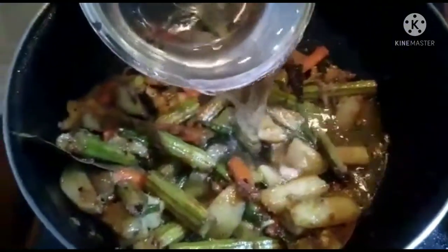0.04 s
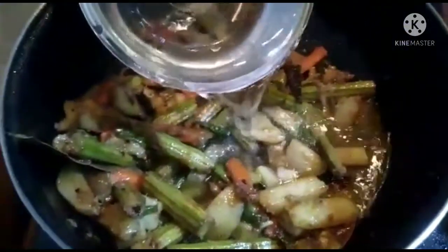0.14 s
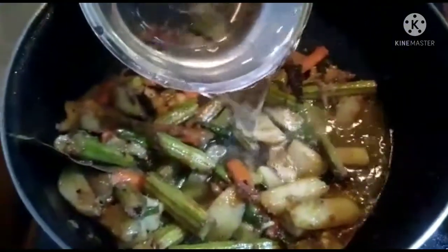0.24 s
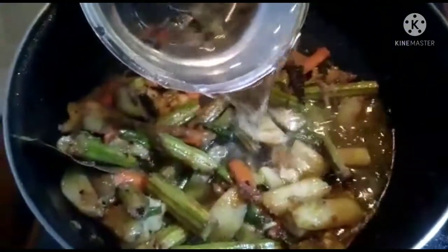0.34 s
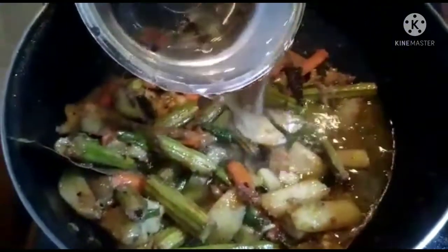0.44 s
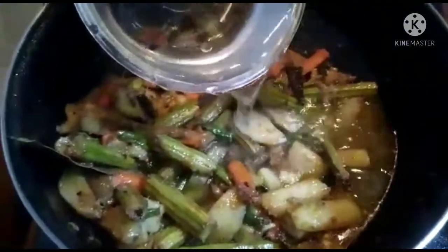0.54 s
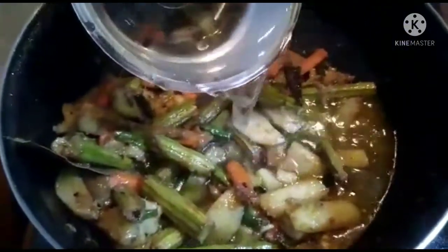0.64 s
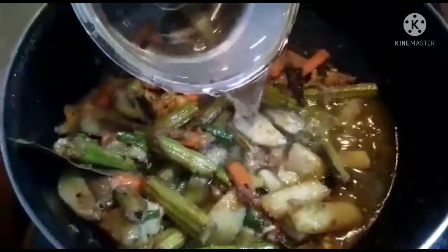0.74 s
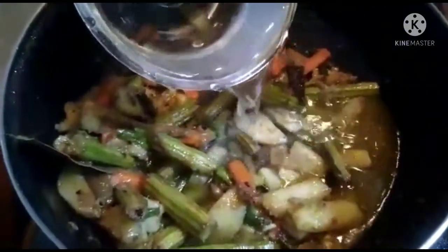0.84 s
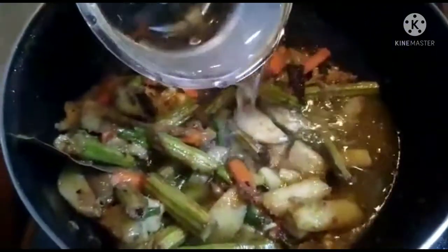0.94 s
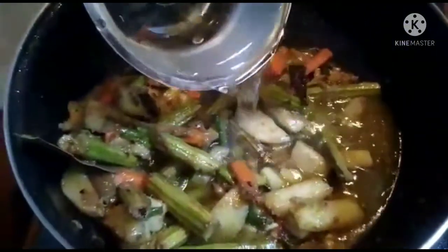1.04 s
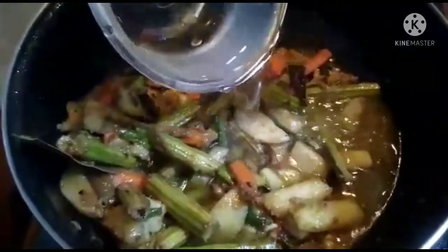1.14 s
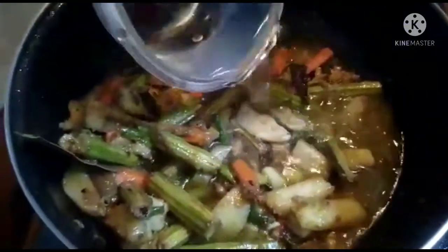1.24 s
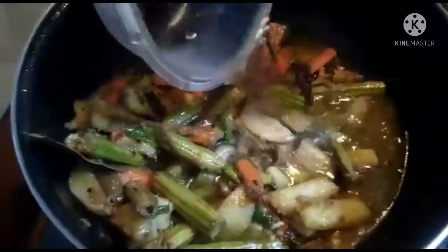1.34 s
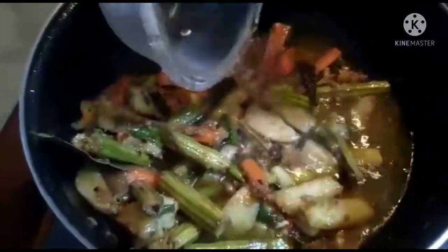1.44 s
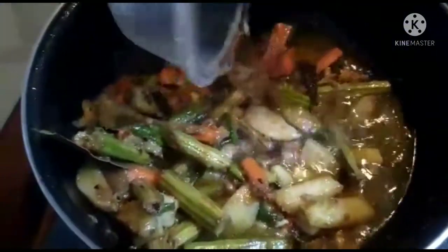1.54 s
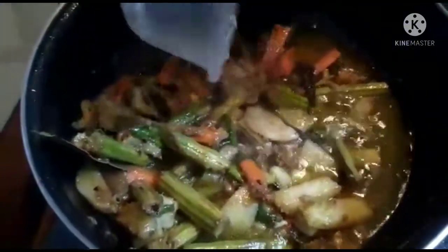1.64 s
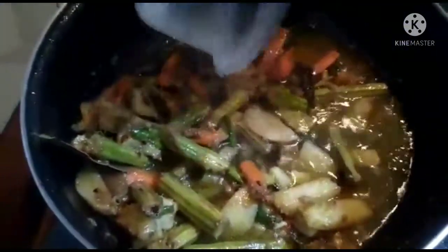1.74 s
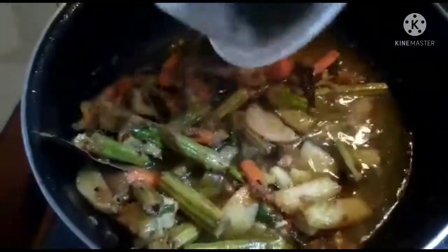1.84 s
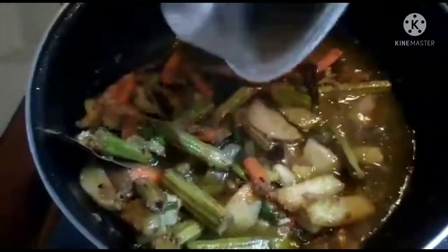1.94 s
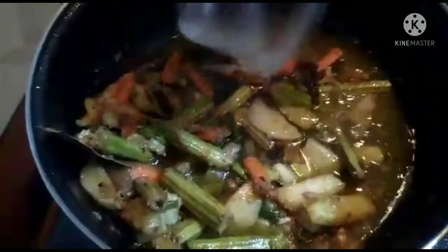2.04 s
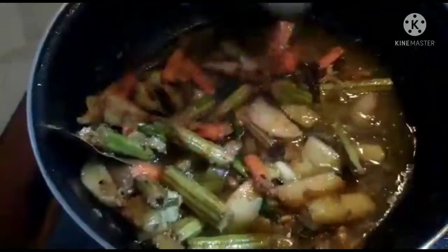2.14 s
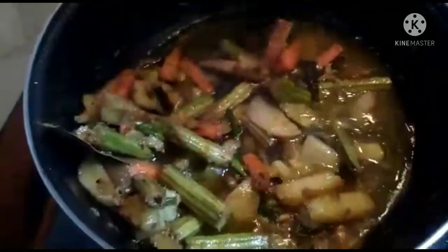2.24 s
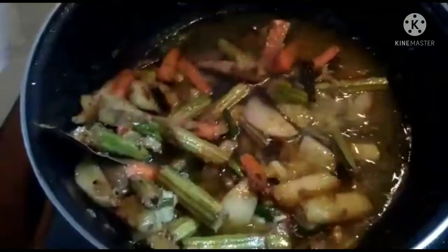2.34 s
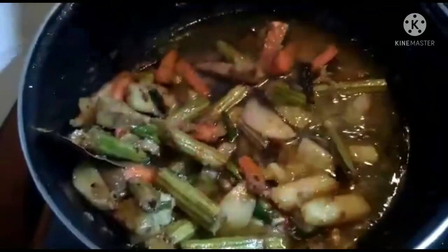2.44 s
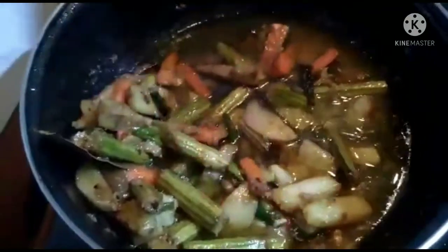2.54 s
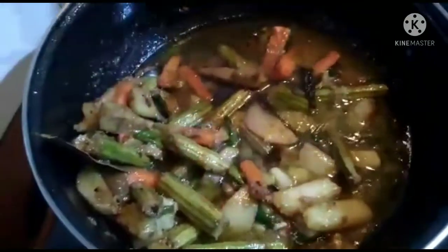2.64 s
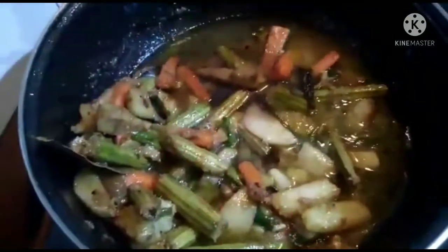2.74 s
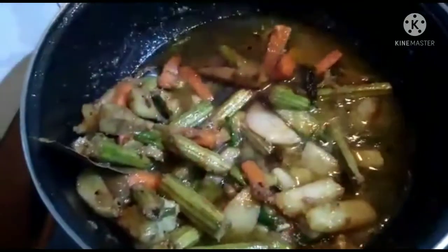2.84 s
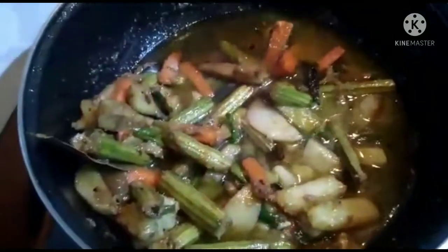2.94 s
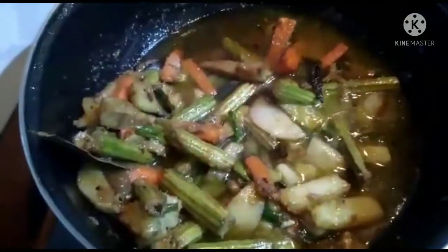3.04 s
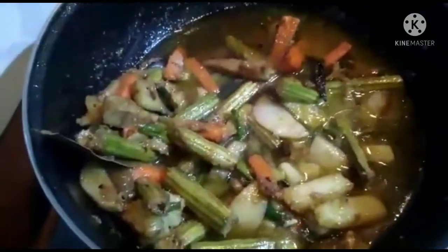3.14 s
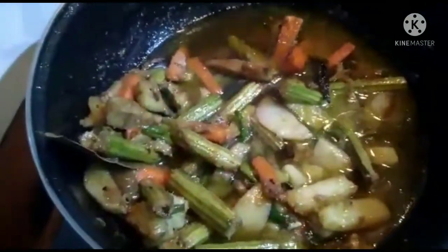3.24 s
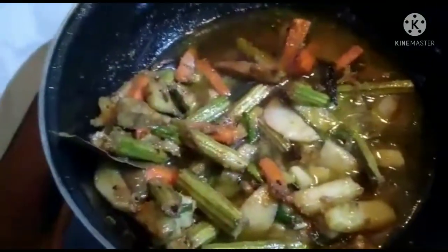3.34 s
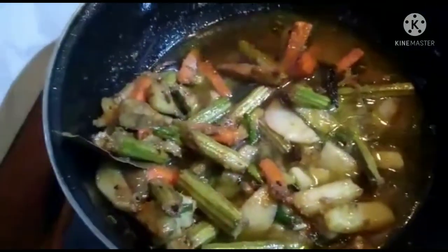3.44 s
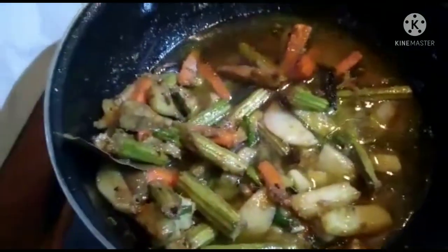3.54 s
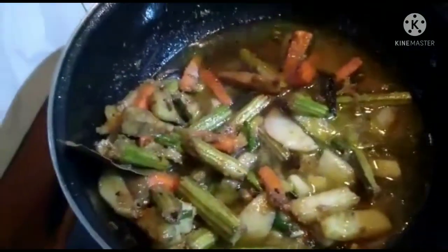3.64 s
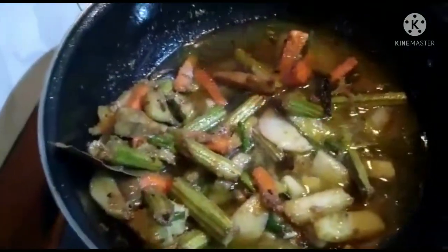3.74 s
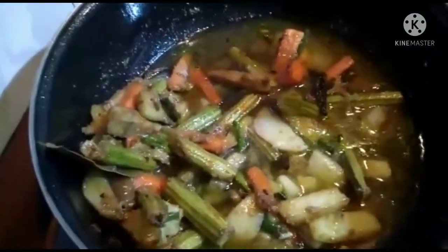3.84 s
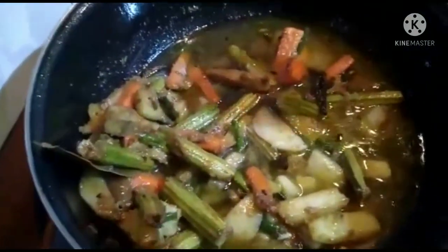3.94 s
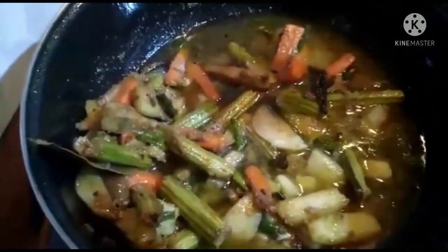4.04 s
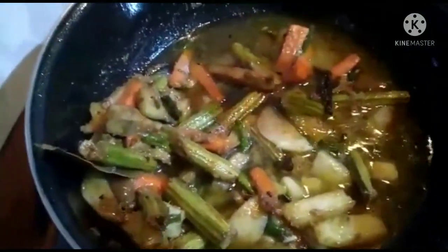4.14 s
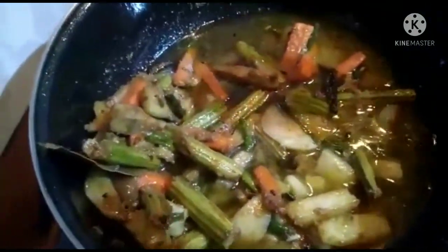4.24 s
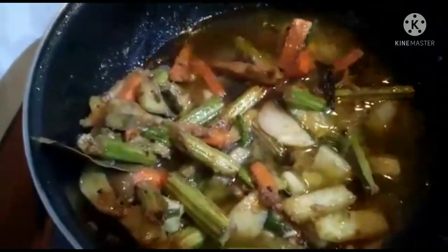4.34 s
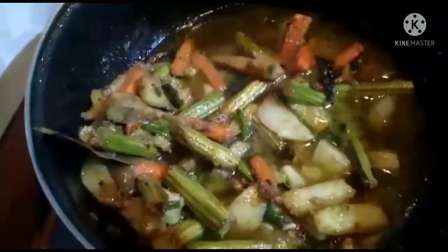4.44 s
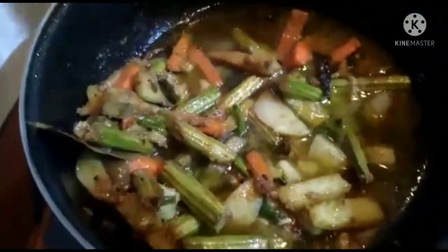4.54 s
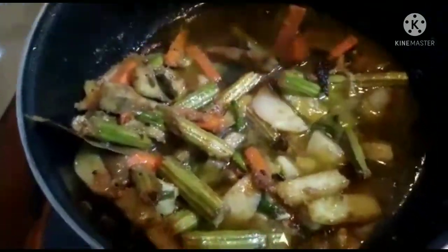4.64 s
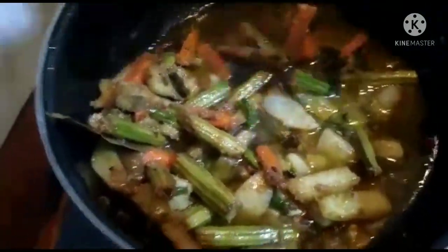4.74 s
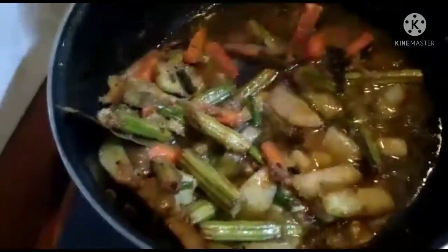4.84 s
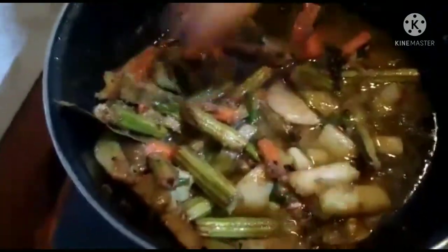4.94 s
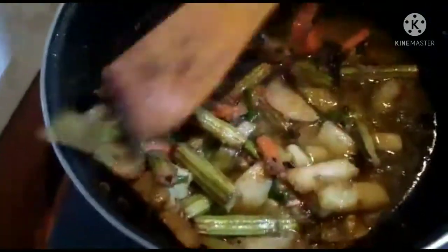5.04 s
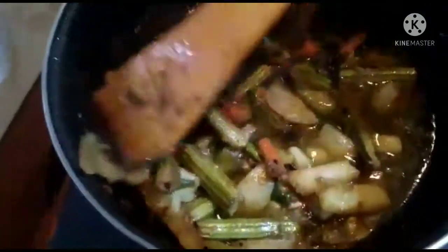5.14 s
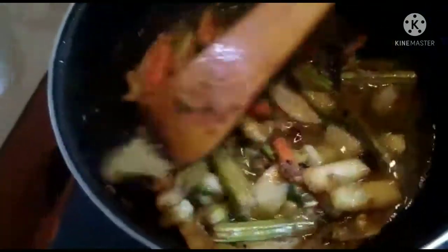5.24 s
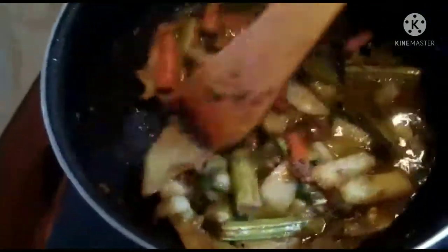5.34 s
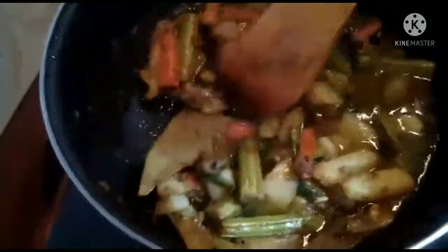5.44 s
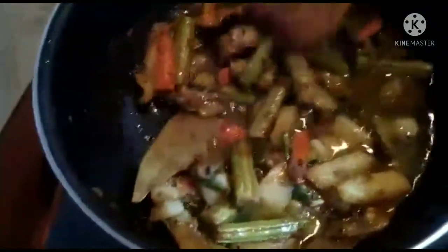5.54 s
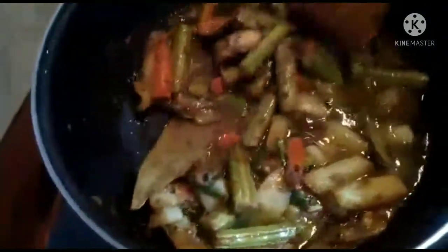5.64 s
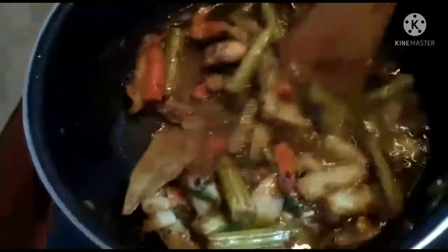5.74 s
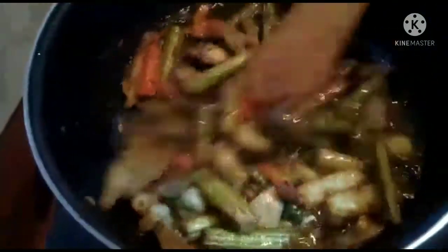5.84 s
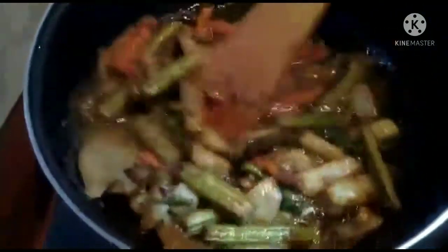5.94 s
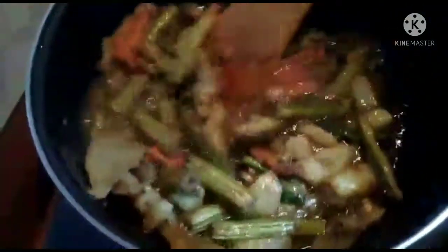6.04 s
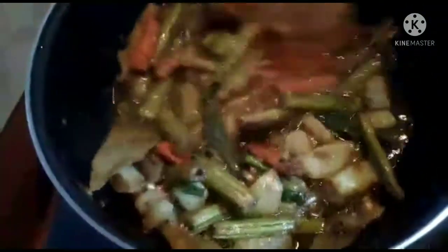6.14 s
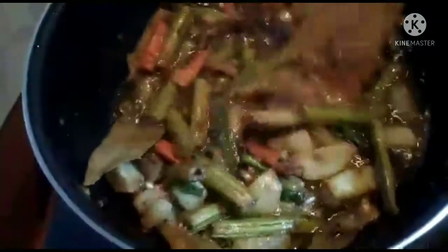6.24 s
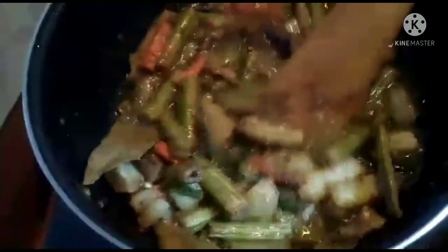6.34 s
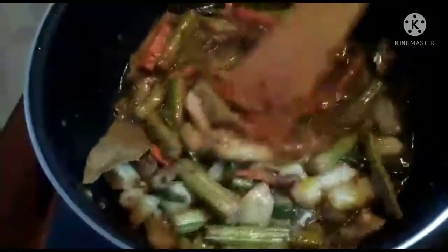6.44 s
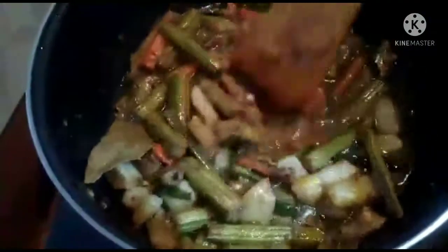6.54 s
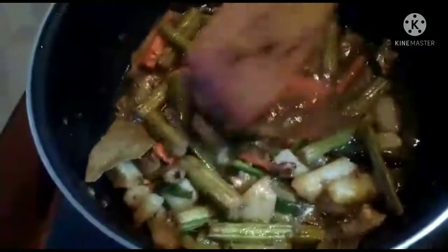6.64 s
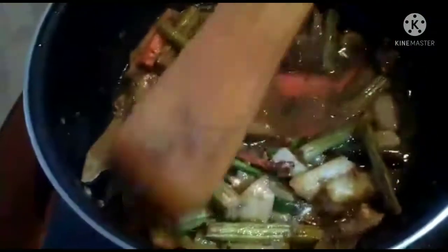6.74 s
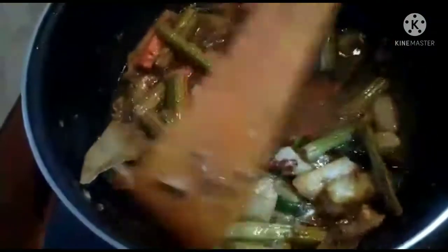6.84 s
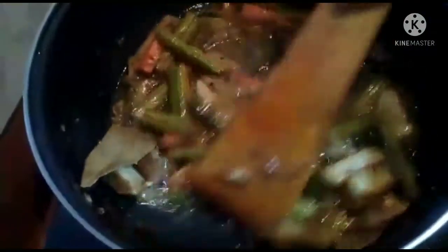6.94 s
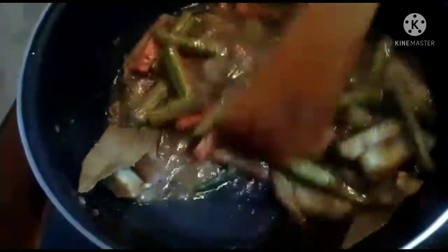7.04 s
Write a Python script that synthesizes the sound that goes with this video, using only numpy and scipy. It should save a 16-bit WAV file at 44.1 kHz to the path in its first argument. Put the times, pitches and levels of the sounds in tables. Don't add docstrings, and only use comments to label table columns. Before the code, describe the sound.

Fierce bright sizzling with popping drops opens the scene and weakens over about three seconds to low bubbling, a fan humming underneath. After a quiet gap, a metal bowl touches down in several knocks, the hardest sharp and ringing. Stirring follows: sizzle flares again with wet smacks, woody scrapes and one hard crack. Close stereo pickup, pan slightly left, short kitchen reverberation.

```python
import sys
import numpy as np
from scipy import signal
from scipy.fft import rfft, irfft, next_fast_len
from scipy.io import wavfile
from scipy.ndimage import uniform_filter1d, map_coordinates

SR = 44100
rng = np.random.default_rng(int(sys.argv[2]) if len(sys.argv) > 2 else 0)


def decibels_to_gain(level_db):
    exponent = np.asarray(level_db, float) / 20
    return 10 ** exponent


def digitize_waveform(pressure):
    field = np.atleast_2d(pressure).T
    bounded = np.clip(field, -1, 1)
    quanta = np.round(bounded * 32767).astype(np.int16)
    wavfile.write(sys.argv[1], SR, quanta)


N = 312669

# (frequency [Hz], density [dB per Hz])
AIR = [(12, -33), (20, -2), (69, -16.5), (103, 1), (141, -27), (192, -11), (248, -30.5), (269, -17.5),
       (585, -24.5), (623, -13.5), (677, -27), (784, -25.5), (3000, -32), (3900, -67), (6600, -120)]
# (frequency [Hz], width [Hz], level [dB])
HUM = [(49.7, 3, -86.5), (99.6, 2.2, -43), (172, 8, -60), (201, 5.5, -63)]
# (frequency [Hz], correlation [0-1])
ALIKE = [(30, 0.34), (60, 0.76), (130, 1), (300, 0.8), (640, 0.85), (1000, 0.32), (1500, 0.077),
         (3000, 0.081), (15000, 0.0094)]
# (frequency [Hz], decay time t60 [s])
KITCHEN = [(150, 0.34), (500, 0.48), (2000, 0.36), (5000, 0.4), (12000, 0.21)]
# (time [s], length [s], level [dB])
SCRAPES = [
    (5.95, .2, -59),
    (6.3, 0.13, -59),
    (6.378, 0.32, -52),
    (6.62, .25, -60),
    (6.86, 0.36, -52.5),
]
# (frequency [Hz], width [Hz], level [dB])
BLADE = [(1140, 120, -1), (1290, 140, 0.5), (1480, 160, -3)]
# (time [s], peak level [dB], brightness [dB per octave], boom level [dB])
KNOCKS = [
    (4.222, -8.5, -3, -11),
    (4.258, -18.5, -3, -5.5),
    (4.309, -18.5, -3.5, -17),
    (4.3394, -11, -3.5, -10),
    (4.551, 1.5, 3.2, -15.5),
    (4.5644, -2.5, 1.5, -13),
    (4.608, -11, 2, -16),
    (5.51, -33, -4, -11.5),
    (5.579, -44, -4, -3),
    (6.085, -29.5, 0, -15),
]
# (frequency [Hz], level [dB])
COUNTER = [(70, -48), (120, -18), (200, -19), (300, -7), (500, -8.5), (800, -10.5), (1300, -5.5),
           (1900, -4), (2600, -10.5), (3200, -24), (4000, -36), (8000, -64), (16000, -88)]
# (frequency [Hz], level [dB], decay time t60 [s])
SLAB = [(298, -5.5, 0.3), (313, -12, .12), (433, -7, 0.18), (458, -13, 0.18), (602, -13.5, 0.18),
        (868, -21, 0.34), (1010, -14, 0.14), (1327, -8.5, 0.15), (1740, -15, 0.53), (1944, -17, 0.22),
        (2510, -5.5, 0.049)]
# (frequency [Hz], level [dB], decay time t60 [s], left-right phase [rad], left over right [dB])
BOWL = [(298, -23, 0.18, -0.8, -5), (298, -28.5, 0.67, 0.5, 3.5), (877, -31, 0.52, -0.5, 1.5),
        (1793, -12.5, 0.64, -2.5, 9), (4026, -31, 0.43, -6, 13), (6680, -36.5, 0.12, -2, 10),
        (10300, -40, 0.17, 1, 6)]
# (time [s], length [s], level [dB], modes above [Hz])
BOWL_DIPS = [
    (4.599, 0.006, -15, 3000),
    (4.707, .009, -25, 1000),
    (4.94, .035, -9, 1000),
]
# (time [s], peak level [dB], pitch [Hz], decay time t60 [s], left over
# right [dB])
TAPS = [(3.906, -30, 2800, 0.11, 2), (3.907, -28.5, 2080, 0.13, -2), (3.91, -36.5, 630, 0.35, -1),
        (3.908, -39, 840, 0.25, -1.2), (3.915, -34, 2300, 0.22, 3), (3.5, -42, 2240, .08, 3),
        (6.427, -27.5, 2380, 0.11, 11.5), (6.449, -29, 1290, 0.046, 5), (6.1, -42, 1000, 0.076, 3),
        (6.3, -41, 1450, 0.07, 3), (1.8, -24, 3100, .06, 7), (2.275, -27, 3050, .06, 7),
        (2.03, -26, 6100, .04, 6), (.297, -18, 2080, .05, 4), (.468, -14.5, 3350, .04, 4),
        (1.24, -22.5, 3100, 0.16, 7), (5.1, -42, 290, 0.32, -2), (5.567, -43, 470, 0.3, 2),
        (5.81, -41, 3860, 0.24, 6), (4.223, -20, 1820, 0.062, 3), (4.341, -34, 2500, .08, 0.1)]
# (time [s], peak level [dB], pitch [Hz], width [octaves], decay time t60 [s], left over right [dB])
SNAP = (6.449, -4, 5500, 1.1, .009, 8)
# (time [s], peak level [dB], pitch [Hz])
SPITS = [(0.29, -13, 3070), (0.325, -13, 2670), (0.394, -6, 5030), (0.4117, -5.5, 2700), (0.47, -15, 3280),
         (0.616, -13, 2720), (0.9194, -15, 5130), (1.1169, -9, 4820), (1.1563, -5, 2910), (1.2, -18, 4330),
         (1.528, -9.5, 4970), (2.0294, -20, 2550), (2.0768, -12.5, 3090), (2.1937, -18, 2650),
         (2.2772, -19, 2860), (2.33, -26, 2680), (2.4149, -20, 2540), (2.6187, -27, 2590),
         (3.7957, -30, 2380)]
# (time [s], peak level [dB], pitch [Hz])
SMACKS = [(5.4635, -28, 2710), (5.4837, -19.5, 3100), (5.526, -26, 2620), (5.6802, -24, 2720),
          (5.8087, -30, 3800), (5.839, -34, 2760), (6.032, -28, 2730), (6.0655, -27, 2730),
          (6.089, -23.5, 4530), (6.139, -29, 2700), (6.184, -27, 2730), (6.222, -21, 8300),
          (6.5034, -26, 4500), (6.56, -26, 6160), (6.689, -34, 2740), (6.8688, -27, 2710),
          (6.8906, -23, 4500)]
# (frequency [Hz], width [Hz], gain [dB])
CAVITY = [(476, 68, 6), (650, 41, 13.5), (1678, 49, 5), (2700, 290, 6.96), (3190, 140, 3), (4790, 400, 0),
          (9750, 2900, 2.06)]
# (frequency [Hz], density [dB per Hz])
STEAM = [(150, -26), (250, -21), (563, -18.5), (646, -19), (809, -13), (1140, -7.5), (1530, -10.5),
         (2660, -5.5), (3630, -6.5), (4870, -1), (5500, -6.5), (9230, -8), (15500, -24.5)]
# (frequency [Hz], left over right [dB])
BALANCE_DB = [(60, -1), (110, -14), (200, -2), (380, 2.5), (700, 0), (1290, -2), (2380, 6.5), (4400, 3),
              (8120, 1.5), (15000, -2.5)]
# (time [s], steam hiss level [dB], water cover [0-1])
HEAT = [(0.01, -26.5, .1), (0.13, -24.5, 0.13), (0.32, -25, 0.08), (0.4, -28, 0.24), (1, -28, 0.32),
        (1.2, -30, .4), (1.6, -32, 0.58), (1.9, -37.5, 0.74), (2.4, -42, 0.93), (2.8, -47, 1),
        (3.4, -50.5, 0.95), (4.1, -53, 0.78), (4.8, -56, .95), (5.25, -58, 0.7), (5.44, -57, 0.58),
        (5.95, -51, 0.06), (6.4, -47, 0.17), (7.08, -50.5, 0.18)]
# (time [s], flare level [dB], decay constant [s])
STROKES = [
    (5.45, 7.5, .1),
    (5.62, 5.5, 0.09),
    (5.8, 3.5, 0.13),
    (6.07, 4.5, 0.074),
    (6.27, 1.5, 0.14),
    (6.41, 3.5, 0.14),
    (6.7, 2.5, .08),
    (6.84, 3.5, 0.13),
]


def unit(x):
    return x / np.sqrt(np.mean(x ** 2) + 1e-20)


def along(points, hz):
    f, v = np.transpose(points)
    return np.interp(np.log(hz + 1), np.log(f + 1), v)


def curves(rows):
    s, *columns = np.transpose(rows)
    return [np.interp(np.arange(N) / SR, s, column) for column in columns]


def wobble(rate):
    coarse = np.arange(0, N + 64, 64)
    knots = rng.standard_normal(int(N * rate / SR) + 4)
    return np.interp(np.arange(N), coarse, map_coordinates(knots, [coarse * rate / SR]))


def filtered(x, response):
    m = next_fast_len(N + 4096, real=True)
    return irfft(rfft(x, m) * response(np.fft.rfftfreq(m, 1 / SR)), m)[..., :N]


def causal(spectrum, size=2048):
    level_db = along(spectrum, np.fft.rfftfreq(size, 1 / SR))
    cepstrum = irfft(np.log(decibels_to_gain(level_db) + 1e-6))
    cepstrum[1:size // 2] *= 2
    cepstrum[size // 2 + 1:] = 0
    answer = irfft(np.exp(rfft(cepstrum)))
    return answer / np.abs(answer).max()


def split_db(left_over_right_db):
    return decibels_to_gain(np.array([[.5], [-.5]]) * left_over_right_db)


def ports(pair):
    def mixing(hz):
        turn = np.arccos(np.clip(along(ALIKE, hz), -1, 1)) / 2
        return np.array([np.cos(turn), np.sin(turn)])

    mid, side = filtered(pair, mixing)
    return np.array([mid + side, mid - side])


def patchy(patchy_db):
    z = signal.stft(rng.standard_normal((2, N)), nperseg=256)[2]
    field = uniform_filter1d(rng.standard_normal(z.shape[1:]), 8, 0)
    field = uniform_filter1d(field, 6, 1)
    return unit(signal.istft(z * decibels_to_gain(patchy_db * unit(field)), nperseg=256)[1][:, :N])


def bursts(count, spread_db, life):
    when, size = rng.random((count, 2)).T
    train = np.bincount((when * N).astype(int), decibels_to_gain(-spread_db * np.log(.03 + size)), N)
    envelope = signal.lfilter([1], [1, -np.exp(-1 / (life * SR))], train)
    return unit(envelope * rng.standard_normal((2, N)))


def cavity(hz):
    return 1 + sum((decibels_to_gain(db) - 1) / np.abs(1 + 2j * (hz - c) / w) ** 2 for c, w, db in CAVITY)


def kitchen():
    rush = filtered(ports(patchy(patchy_db=2.5)), lambda hz: decibels_to_gain(along(AIR, hz)))
    rush = filtered(rush, lambda hz: 1 - 0.57 / (1 + ((hz - 100) / 14) ** 4))
    t = np.arange(N) / SR
    lines = 0
    for hz, width, db in HUM:
        level = decibels_to_gain(db + 1.6 * wobble(3 * width))
        drift = 0.404 * width * np.cumsum(wobble(width)) / SR
        lines = lines + level * np.sin(2 * np.pi * (hz * t + drift))
    return decibels_to_gain(-49) * unit(rush) + lines


def scrape():
    slips = bursts(count=2500, spread_db=2.2, life=0.0012)
    drag = 0
    for s, length, db in SCRAPES:
        u = np.clip((np.arange(N) / SR - s) / length, 0, 1)
        drag = drag + decibels_to_gain(db) * np.sin(np.pi * np.sqrt(u))

    def blade(f):
        return sum(decibels_to_gain(db) / (1 + (2 * (f - c) / w) ** 2) for c, w, db in BLADE)

    return drag * split_db(4.4) * unit(filtered(slips, blade))


def room(x):
    hz, t, z = signal.stft(rng.standard_normal((2, SR // 2)), SR, nperseg=256)
    decay = decibels_to_gain(-60 * t / along(KITCHEN, hz)[:, None])
    tail = signal.istft(z * decay, SR, nperseg=256)[1]
    delayed = np.pad(x, (200, 0))[None]
    return signal.fftconvolve(delayed, tail / np.linalg.norm(tail[0]), axes=1)


def knocks():
    direct, wet = np.zeros(N + 2 * SR), np.zeros((2, N + 2 * SR))
    t = np.arange(SR // 2) / SR
    for s, db, bright_db, boom_db in KNOCKS:
        tilt = [(hz, level + bright_db * np.log2(hz / 700)) for hz, level in COUNTER]
        rattle = rng.standard_normal(800) * decibels_to_gain(-60 * t[:800] / 0.0055)
        thud = signal.fftconvolve(rattle, causal(tilt))
        thud = decibels_to_gain(db - 6.5) * thud / np.abs(thud).max()
        boom = 0
        for hz, level, t60 in SLAB:
            boom = boom + decibels_to_gain(level + rng.normal(0, 1.3) - 60 * t / t60) * np.sin(2 * np.pi * hz * t)
        start = round(s * SR)
        direct[start:][:len(t)] += decibels_to_gain(db + boom_db) * boom * (1 - np.exp(-t / .003))
        direct[start:][:len(thud)] += thud
        answer = room(thud)
        wet[:, start:][:, :answer.shape[1]] += answer
    late = filtered(direct[:N], lambda hz: np.exp(-2j * np.pi * hz * .0001))
    return np.array([direct[:N], decibels_to_gain(-0.5) * late]) + decibels_to_gain(7.0) * ports(wet[:, :N])


def bowl():
    strike_s = 4.5644
    now = np.arange(N) / SR
    t = np.clip(now - strike_s, 0, None)
    half, ring = np.array([[.5], [-.5]]), 0
    for hz, db, t60, lead, pan_db in BOWL:
        hush_db = 0
        for s, length, dip_db, low_hz in BOWL_DIPS:
            if hz > low_hz:
                hush_db = hush_db + dip_db * np.exp(-((t + strike_s - s) / length) ** 2)
        flutter_db = 1.2 * wobble(30)
        level = decibels_to_gain(db + half * pan_db + hush_db + flutter_db - 60 * t / t60)
        ring = ring + level * np.sin(2 * np.pi * hz * t + half * lead)
    return ring * (1 - np.exp(-t / .008))


def puffs(events, gain_db):
    out, t = np.zeros((2, N + SR)), np.arange(2 ** 13) / SR
    f = np.fft.rfftfreq(len(t), 1 / SR) + 1
    for s, db, hz, octaves, t60, pan_db in events:
        colour = np.exp(-(np.log2(f / hz) / np.clip(octaves, .04, 3)) ** 2)
        colour = colour * cavity(f) / (1 + (f / 10500) ** 8)
        puff = unit(irfft(rfft(rng.standard_normal((2, len(t)))) * colour))
        fade = decibels_to_gain(-60 * t / np.clip(t60, .004, .3)) * (1 - np.exp(-t / 0.00035))
        out[:, round(s * SR):][:, :len(t)] += decibels_to_gain(db + gain_db) * split_db(pan_db) * puff * fade
    return out[:, :N]


def spits():
    octaves, drop_t60, drop_pan_db = 0.83, 0.025, 6.5
    drops = [(s, db, hz, octaves, drop_t60, drop_pan_db) for s, db, hz in SPITS + SMACKS]
    taps = [(s, db, hz, 8.5 / np.sqrt(hz), t60, pan_db) for s, db, hz, t60, pan_db in TAPS]
    return puffs(drops + [SNAP], gain_db=-9) + ports(puffs(taps, gain_db=-5.5))


def heat():
    hiss_db, cover = curves(HEAT)
    t = np.arange(N) / SR
    for s, db, dies in STROKES:
        since = np.clip(t - s, 0, None)
        rise = 1 - np.exp(-since / 0.033)
        hiss_db = hiss_db + 1.6 * db * rise * np.exp(-since / dies)
    stirred = 1 / (1 + np.exp(-(t - 6.37) / 0.034))
    simmer_db = hiss_db - 14 + 13 * cover
    boil_db = -2 + 5.5 * cover + 5 * stirred
    fizz_db = -0.67 + 1.85 * cover
    return hiss_db, simmer_db, boil_db, fizz_db


def crackle():
    ticks = bursts(count=260, spread_db=3.0, life=0.00056)

    def bright(hz):
        return cavity(hz) / (1 + (2600 / (hz + 1)) ** 4) / (1 + (hz / 10500) ** 8)

    return decibels_to_gain(heat()[0] - 10.5) * split_db(5.2) * unit(filtered(ticks, bright))


def bubbles(count, mid_hz, cycles):
    when, size, phase, pitch = rng.random((count, 4)).T[:, :, None]
    t = np.arange(400) / SR
    turns = mid_hz * 2 ** (2.2 * (pitch - .5)) * t
    shape = decibels_to_gain(-4 * np.log(0.14 + size)) * turns * np.exp(-turns / cycles)
    where = ((when * N).astype(int) + np.arange(len(t))).ravel()
    wave = 2 * np.pi * turns * (1 + 0.0045 * turns)
    sides = []
    for k in range(2):
        rings = shape * np.sin(wave + k * 6 * phase)
        sides.append(np.bincount(where, rings.ravel(), N + 400)[:N])
    return unit(np.array(sides))


def pan_walls(pair, share_db, t60):
    t = np.arange(6000) / SR
    paths = rfft(rng.standard_normal((2, len(t))) * decibels_to_gain(-60 * t / t60))
    colour = np.sqrt(uniform_filter1d(np.abs(paths) ** 2, size=30, axis=1))
    paths = irfft(paths / colour)
    echoes = unit(signal.oaconvolve(np.roll(pair[:1], 300), paths, axes=1)[:, :N])
    return unit(pair) + decibels_to_gain(share_db) * echoes


def sizzle():
    hiss_db, simmer_db, boil_db, fizz_db = heat()
    small = decibels_to_gain(-6) * bursts(count=6000, spread_db=1.0, life=0.0009)
    large = decibels_to_gain(-13.5) * bursts(count=400, spread_db=3.0, life=0.0057)
    ringing = decibels_to_gain(-14.5) * bubbles(count=2000, mid_hz=4412, cycles=6.8)
    steam = patchy(patchy_db=1.5) + small + large + ringing
    steam = ports(pan_walls(steam, share_db=-7, t60=.09))

    def colour(hz):
        return decibels_to_gain(along(STEAM, hz)) * cavity(hz) * split_db(along(BALANCE_DB, hz))

    def below(hz):
        return 1 / (1 + (hz / np.array([[[1700]], [[3800]], [[7000]]])) ** 6)

    steam = unit(filtered(steam, colour))
    simmer, low, body = filtered(steam, below)
    boil, fizz = low - simmer, steam - body
    swell = decibels_to_gain(hiss_db + 5.5 + 0.53 * wobble(13) + 0.57 * wobble(30) + 0.3 * wobble(6))
    side = split_db(3 + 0.97 * wobble(8))
    upper = steam - simmer + (decibels_to_gain(boil_db) - 1) * boil + (decibels_to_gain(fizz_db) - 1) * fizz
    return swell * side * upper + decibels_to_gain(simmer_db + 1.2 * wobble(5.2)) * unit(simmer)


def scene():
    return kitchen() + scrape() + knocks() + bowl() + spits() + crackle() + sizzle()


def roll_off(x):
    return signal.sosfilt(signal.butter(12, 15270, fs=SR, output="sos"), x)


def record(dry):
    return roll_off(dry)


dry = scene()
out = record(dry)
digitize_waveform(out)
```